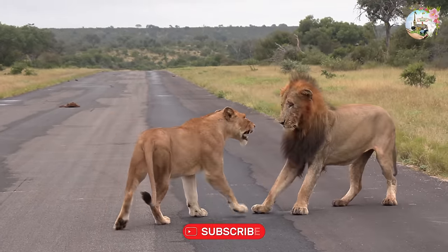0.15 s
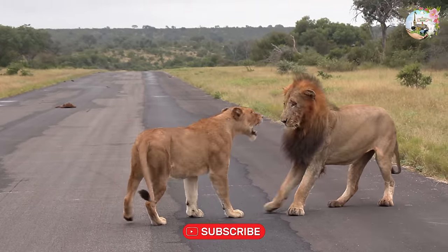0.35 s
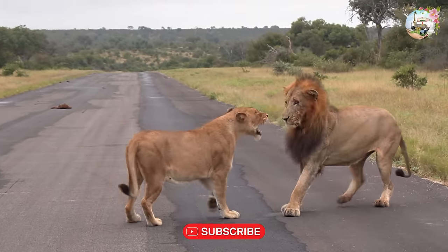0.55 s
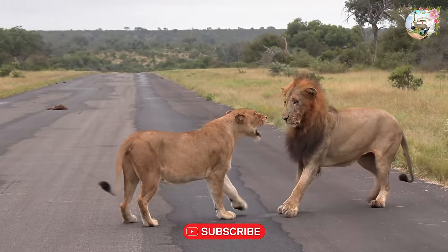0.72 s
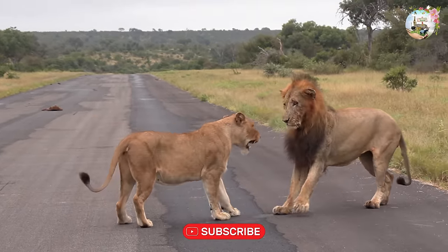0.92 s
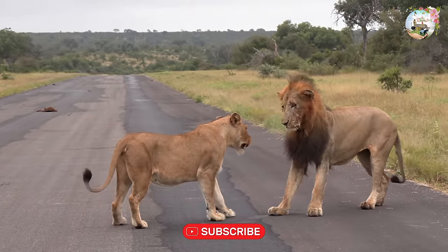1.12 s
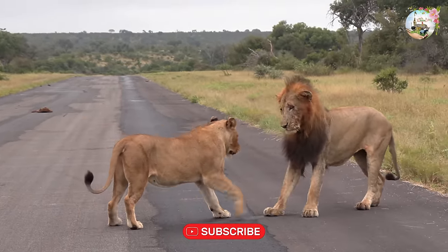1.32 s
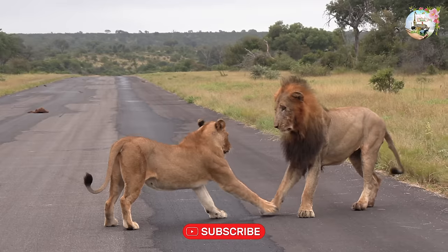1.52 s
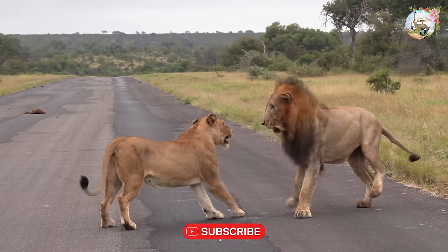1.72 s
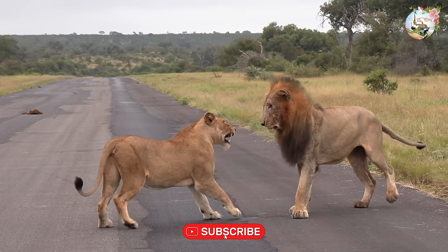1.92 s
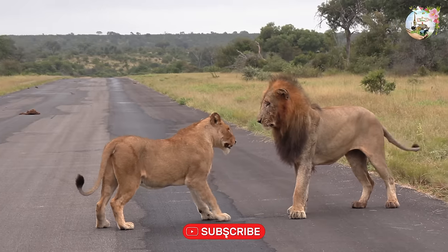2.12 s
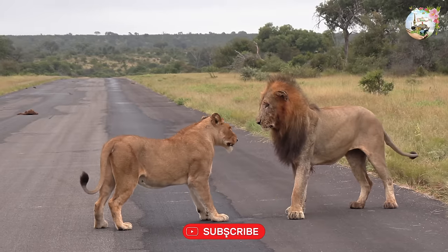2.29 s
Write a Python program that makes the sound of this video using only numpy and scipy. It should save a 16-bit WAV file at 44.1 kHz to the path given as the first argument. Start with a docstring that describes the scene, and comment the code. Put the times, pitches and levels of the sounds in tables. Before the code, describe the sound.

Raspy big-cat snarls over a wavering low chest growl, with breath hissing past teeth and hard throaty cracks; strongest around the middle and again near the end, outdoors, dry, faint low rumble, weighted right.

```python
"""Two big cats snarl at each other in short bursts on an open road, to the right of a stereo microphone. Uneven
pulses of the vocal folds ring mouth, rasp and throat; a wavering chest tone growls near 100 Hz. Filtered noise
hisses past the teeth, hard slaps of the folds are decaying pairs of sines, short clicks of tongue or teeth are
tiny noise bursts, and a faint outdoor rumble lies beneath."""
import sys
import numpy as np
from scipy import signal
from scipy.fft import rfft, irfft
from scipy.io import wavfile
from scipy.ndimage import uniform_filter1d

SR = 44100
rng = np.random.default_rng(int(sys.argv[2]) if len(sys.argv) > 2 else 0)


def generate_wav(sig):
    """Save sig (samples, or channels by samples) to the path in sys.argv[1] as 16-bit PCM at SR."""
    pcm = np.round(np.clip(np.atleast_2d(sig).T, -1, 1) * 32767).astype(np.int16)
    wavfile.write(sys.argv[1], SR, pcm)


N = 103635  # samples

# Hard slaps of the vocal folds. Each row: start in seconds, level in dB, low ring in Hz,
# upper ring's level in dB relative to the low ring, upper ring in Hz.
FOLD_SLAPS = [(0.239, -27, 487, -4, 687), (0.3904, -14.5, 332, -9, 938), (0.424, -14.5, 351, -7.5, 1197),
              (0.893, -18, 198.5, -23, 835), (0.9656, -17, 201.4, 0.5, 1100),
              (1.0419, -17, 197.5, -4.5, 928), (1.099, -10.5, 209, -7, 918), (1.158, -15, 198.4, 1, 876),
              (1.221, -18.5, 227, 0, 857), (1.382, -23.5, 163, -4, 1407), (1.4887, -17, 200, -11, 1120),
              (1.571, -17.5, 348.5, -9, 1160), (1.598, -12, 355, -15, 981.4), (1.968, -20, 364, -12, 816),
              (1.987, -14.5, 141.4, -8.5, 1112), (2.014, -15.5, 167, -10.5, 946),
              (2.044, -21.5, 439, -0.5, 833.2), (2.241, -28, 386, -10, 793)]
# Colour of breath noise and of tongue and teeth clicks. Each row: frequency in Hz, relative density in dB per
# Hz.
HISS_COLOUR = [(880, -19), (1500, -4.5), (1760, -2), (2780, -2.5), (3930, -6.5), (5940, -13.5),
               (8470, -37.5), (11000, -75)]

FOLDS_PER_S, FOLDS_SPREAD_DB = 100, 4.5  # middle pulse rate, scale of the random pulse levels
BREATH = 0.37  # share of noise between the fold pulses
VOICE_T60, HISS_T60 = 0.16, 0.27  # seconds for a burst to die by 60 dB
ATTACK_S, OPEN_S = 0.0022, 0.011  # the mouth opens slower than the chest starts
SWELL_DB, SWELL_S = -8, 0.05  # breath leaks before a burst: level at its start, seconds per 20 dB
MOUTH_WIDTH, RASP_WIDTH, TEETH_WIDTH = 68, 92, 300  # Hz, narrowest stage of each ring
MOUTH_LOWER, RASP_UPPER = 0.748, 1.247  # frequency ratios of weaker neighbour rings
TEETH_DB = -5  # whistle against the plain hiss
PUFF_DB, PUFF_S, FLUTTER_DB = 8, 0.004, 2  # puff scale, fade and smoothing time, flutter limit
CHEST_ROUGH, CHEST_WIDTH = 0.25, 30  # share of rough ring in the chest, its width in Hz
BELLY_HZ, BELLY_DB = 72, -10  # loose rumble under the chest tone
THROAT_HZ, THROAT_WIDTH = 211.2, 14.4  # Hz
SLAP_T60, UPPER_T60, SLAP_RISE_S = 0.041, 0.029, 0.00036
PUSH_DB = -5  # a pressure dip deepens the first downward swing of a slap
SHUT_DB, SHUT_S = -8, 0.006  # depth and time scale of the voice choking on a slap
AIR_DB = -47
ECHO_DB, ECHO_T60 = -17, 0.084
OUTPUT_DB = 3  # lifts both channels
EDGE_HZ, BASS_CUT_HZ = 9100, 58


def gain_of(db):
    """Amplitude factor of a level in dB."""
    return 10 ** (np.asarray(db) / 20)


def evened(x):
    """Scales a sound to an RMS of one."""
    return x / np.sqrt(np.mean(x ** 2) + 1e-20)


def steady(x):
    """Evens the slow level, keeps the fast lumps."""
    return x / np.sqrt(uniform_filter1d(x ** 2, size=3000).clip(1e-20))


def read(points, hz):
    """Reads a curve of (Hz, value) points along a logarithmic frequency axis."""
    f, value = np.transpose(points)
    return np.interp(np.log(hz + 1), np.log(f + 1), value)


def add(mix, s, sound):
    """Lays a sound into the mix at s seconds."""
    part = mix[round(s * SR):][:len(sound)]
    part += sound[:len(part)]


def slow(size):
    """A smooth random wander of RMS one; size is the smoothing length in samples."""
    return evened(uniform_filter1d(uniform_filter1d(rng.standard_normal(N), size), size))


def coloured(spectrum):
    """White noise shaped by a spectrum, at an RMS of one."""
    colour = gain_of(read(spectrum, np.fft.rfftfreq(N, 1 / SR)))
    return evened(irfft(rfft(rng.standard_normal(N)) * colour, N))


def resonate(x, hz, width):
    """One resonance along the curve hz: shifts it to zero, smooths, shifts back."""
    turn = np.exp(2j * np.pi * np.cumsum(hz * np.ones(len(x))) / SR)
    r = np.exp(-np.pi * width / SR)
    return 2 * (turn * signal.lfilter([1 - r], [1, -r], x / turn)).real


def ring(drive, hz, width):
    """A steep three-stage resonance that drifts a little as the jaw moves."""
    hz = hz * (1 + 0.031 * slow(size=1500))
    narrow = resonate(drive, hz, width)
    steeper = resonate(narrow, hz, 2 * width)
    return steady(resonate(steeper, hz, 4 * width))


def held(starts, values):
    """Each burst's value until the next burst, with a quick glide."""
    at = np.searchsorted(starts, np.arange(N) / SR).clip(1) - 1
    return uniform_filter1d(1. * values[at], size=400)


def bursts(starts, holds, dbs, t60, swell_db=-60, attack=ATTACK_S):
    """A faint swell, attack, hold, then a dying release; the loudest burst wins."""
    t = np.arange(N) / SR - starts[:, None]
    swell = gain_of(swell_db + 20 * t.clip(-1, 0) / SWELL_S)
    rise = np.maximum((t / attack).clip(0, 1), swell)
    release_db = -60 * (t - holds[:, None]).clip(0, 1) / t60
    return (rise * gain_of(dbs[:, None] + release_db)).max(axis=0)


def outdoor_air():
    """A faint low rumble of coloured noise whose level wanders slightly."""
    # Each row: frequency in Hz, relative density in dB per Hz.
    air_colour = [(12, -27.5), (20, -0.5), (130, -7), (510, -21.5), (2850, -42.5), (8470, -61.5),
                  (11000, -91.5)]
    return gain_of(AIR_DB + 0.36 * slow(size=2000)) * coloured(air_colour)


def folds():
    """Vocal folds as uneven pulses of uneven size with breath noise between."""
    size = gain_of(FOLDS_SPREAD_DB * np.minimum(rng.exponential(1, N), 3))
    turns = np.cumsum(FOLDS_PER_S * np.exp(.4 * slow(size=300))) / SR
    pulses = -size * (np.diff(np.floor(turns), prepend=0) > 0)
    return (1 - BREATH) * evened(pulses) + BREATH * rng.standard_normal(N)


def puffs(drive):
    """Gain of the hiss: it jumps at each hard slap and flutters with the folds."""
    hard = np.zeros(N)
    fade = np.exp(-np.arange(SR // 20) / SR / PUFF_S)
    for row in FOLD_SLAPS:
        add(hard, row[0], gain_of(PUFF_DB) * fade * (1 - fade ** 8))
    strength = abs(drive) - abs(drive).mean()
    flutter = evened(signal.lfilter([1], [1, -np.exp(-1 / (SR * PUFF_S))], strength))
    return gain_of(FLUTTER_DB * np.tanh(flutter / 2)) + hard


def snarl(drive):
    """Fold pulses ring the mouth and an upper rasp; fluttering noise hisses and whistles at the teeth."""
    # Each row: start in seconds, hold in seconds, mouth ring in Hz, its level in dB, rasp in Hz,
    # its level in dB, tooth whistle in Hz, hiss level in dB.
    snarl_bursts = [(0.037, 0.015, 411, -61, 980, -94, 2740, -67),
                    (0.182, 0.067, 445, -49, 1020, -68, 2640, -60.5),
                    (0.234, .09, 474, -39, 938, -54, 2440, -54.5),
                    (0.304, 0.098, 356, -35, 892, -50, 2720, -50.5),
                    (0.374, 0.064, 351.4, -29, 1090, -49, 2110, -64),
                    (0.508, 0.047, 402, -31, 992, -40, 3040, -48.5),
                    (0.616, 0.07, 413, -39, 1085, -41, 2450, -46.5),
                    (0.683, 0.043, 384, -39.5, 1014, -35.5, 2810, -45),
                    (0.734, 0.039, 358, -46, 885, -42, 2185, -50),
                    (0.843, 0.058, 438, -41, 926, -36.5, 2246, -49.5),
                    (0.967, 0.15, 401, -39, 960, -36, 2690, -45),
                    (1.015, 0.072, 341, -32, 923, -32, 2780, -47.5),
                    (1.103, 0.026, 319.4, -26.5, 937, -34, 2715, -47),
                    (1.162, 0.021, 356, -42, 1008, -34.5, 2175, -53),
                    (1.207, 0.0043, 373, -35, 932, -37, 2790, -53.5),
                    (1.368, 0.045, 392, -41.5, 1028, -43.5, 2286, -52.5),
                    (1.477, 0.043, 391, -31.5, 1107, -45, 3880, -50),
                    (1.565, 0.056, 412, -33, 1027, -44, 2230, -54),
                    (1.641, 0.07, 350, -38.5, 1033, -59.5, 2640, -61.5),
                    (1.787, 0.057, 344, -46, 891, -49, 3240, -60),
                    (1.888, 0.061, 405, -49.5, 1050, -58, 2760, -63),
                    (1.957, 0.039, 404, -27, 1024, -62, 2100, -52.5),
                    (1.987, 0.036, 386, -26, 1188, -36, 2220, -50),
                    (2.19, 0.07, 424, -59, 1166, -56, 3830, -62),
                    (2.316, .05, 362, -51, 1190, -60, 3680, -63.5)]
    s, hold, mouth_hz, mouth_db, rasp_hz, rasp_db, teeth_hz, hiss_db = np.transpose(snarl_bursts)
    mouth_hz, rasp_hz = held(s, mouth_hz), held(s, rasp_hz)

    mouth = ring(drive, mouth_hz, MOUTH_WIDTH)
    mouth = mouth + gain_of(-5) * ring(drive, MOUTH_LOWER * mouth_hz, 120)
    rasp = ring(drive, rasp_hz, RASP_WIDTH)
    rasp = rasp + gain_of(-5.5) * ring(drive, RASP_UPPER * rasp_hz, 81)
    rasp = rasp + gain_of(-7) * ring(drive, rasp_hz / RASP_UPPER, 70)

    whistle = ring(rng.standard_normal(N), held(s, teeth_hz), TEETH_WIDTH)
    hiss = evened(coloured(HISS_COLOUR) + gain_of(TEETH_DB) * whistle) * puffs(drive)

    voiced = bursts(s, hold, mouth_db, VOICE_T60, attack=OPEN_S) * mouth
    voiced = voiced + bursts(s, hold, rasp_db, VOICE_T60, SWELL_DB, OPEN_S) * rasp
    return voiced, bursts(s, hold, hiss_db, HISS_T60, SWELL_DB, OPEN_S) * hiss


def growl(drive):
    """A wavering chest tone with rough edges, and the throat's hum with a weaker rattle."""
    # Each row: start in seconds, hold in seconds, chest pitch in Hz, chest level in dB,
    # throat level in dB.
    growl_bursts = [(0.189, 0.019, 119.1, -36.5, -69), (0.236, 0.04, 85.3, -28.5, -49),
                    (0.281, 0.14, 99.14, -26.5, -67), (0.543, 0.0067, 116.9, -26, -43.5),
                    (0.604, 0.14, 108.7, -28, -44), (0.739, 0.054, 84.57, -39.5, -37.5),
                    (0.838, 0.077, 105.6, -37.5, -34), (0.959, 0.044, 85.1, -29, -24),
                    (1.023, 0.04, 89, -30.5, -20.5), (1.096, 0.017, 109.8, -27, -23),
                    (1.149, 0.058, 109.4, -31, -32), (1.376, 0.038, 124.7, -38, -39),
                    (1.476, 0.058, 113.3, -26, -38), (1.56, 0.059, 99.1, -24.5, -36),
                    (1.65, 0.06, 90.7, -34, -73), (1.799, 0.02, 83.5, -46.5, -45),
                    (1.899, 0.046, 105.2, -27.5, -44.5), (1.97, 0.046, 119.6, -20.5, -31),
                    (2.059, 0.06, 126.9, -40.5, -64), (2.229, 0.023, 142.1, -39, -60.5),
                    (2.326, .05, 134.8, -39, -45.5)]
    s, hold, hz, chest_db, throat_db = np.transpose(growl_bursts)
    hz = held(s, hz)

    tone = np.sqrt(2) * np.sin(2 * np.pi * np.cumsum(hz * (1 + .04 * slow(size=400))) / SR)
    smooth = tone * gain_of(4.1 * slow(size=300))
    rough = ring(drive, hz, CHEST_WIDTH)
    chest = steady((1 - CHEST_ROUGH) * smooth + CHEST_ROUGH * rough)
    chest = chest + gain_of(BELLY_DB) * ring(drive, BELLY_HZ, 12)

    throat_hz = THROAT_HZ * (1 + 0.0524 * slow(size=600))
    hum = np.sqrt(2) * np.sin(2 * np.pi * np.cumsum(throat_hz) / SR)
    throat = steady(hum + .5 * ring(drive, THROAT_HZ, THROAT_WIDTH))
    return bursts(s, hold, chest_db, VOICE_T60) * chest + bursts(s, hold, throat_db, VOICE_T60) * throat


def slaps():
    """Each slap starts with a downward push and rings low and high; clicks of tongue or teeth are fast-dying
    noise."""
    # Short noisy clicks of tongue or teeth. Each row: start in seconds, level in dB.
    tongue_clicks = [(0.238, -40), (0.332, -37), (0.363, -38), (0.613, -38), (1.38, -36), (2.161, -45),
                     (2.207, -49)]
    out, t = np.zeros(N), np.arange(4000) / SR
    rise = (1 - np.exp(-t / SLAP_RISE_S)) ** 2
    for s, db, hz, upper_db, upper_hz in FOLD_SLAPS:
        # the push lasts half a cycle of the low ring
        push = -gain_of(PUSH_DB) * np.sin(np.pi * (2 * hz * t).clip(0, 1)) ** 2
        low = -np.sin(2 * np.pi * hz * t) * gain_of(-60 * t / SLAP_T60)
        upper = -np.sin(2 * np.pi * upper_hz * t) * gain_of(upper_db - 60 * t / UPPER_T60)
        add(out, s, gain_of(db) * (push + rise * (low + upper)))
    for s, db in tongue_clicks:
        add(out, s, coloured(HISS_COLOUR)[:4000] * gain_of(db - 60 * t / 0.0069))
    return out


def choke():
    """Gain of the voice, which chokes for a moment just after each slap starts."""
    t = np.arange(N) / SR
    dips = sum(np.exp(-((t - row[0]) / SHUT_S - .5) ** 2) for row in FOLD_SLAPS)
    return gain_of(SHUT_DB * dips)


def voices():
    """Both cats and the outdoor air; the folds drive growl and snarl, which choke on each slap."""
    drive = folds()
    voiced, hiss = snarl(drive)
    return choke() * (growl(drive) + voiced) + hiss + outdoor_air()


def scatter(x):
    """A short smear of reflections off road and grass, as decaying noise taps."""
    t = np.arange(SR // 4) / SR
    taps = rng.standard_normal(len(t)) * gain_of(-60 * t / ECHO_T60)
    return signal.fftconvolve(x, taps / np.linalg.norm(taps))[:N]


def ports(x, other):
    """The left port hears the same sound weaker, shifted in phase and partly unrelated."""
    # Each row: frequency in Hz, left minus right level in dB.
    left_level = [(60, -4.5), (200, -7), (690, -9), (2360, -7)]
    # Each row: frequency in Hz, left-right likeness from 0 to 1.
    likeness = [(60, 1), (250, 1), (500, 0.21), (1000, 0.76), (2500, 0.47)]
    # Each row: frequency in Hz, phase in radians by which the left leads.
    left_lead = [(150, 0.76), (430, 0.75), (860, -0.54)]
    hz = np.fft.rfftfreq(N, 1 / SR)
    same = np.clip(read(likeness, hz), 0, 1)
    shared = same * np.exp(1j * read(left_lead, hz)) * rfft(x)
    unrelated = np.sqrt(1 - same ** 2) * rfft(other)
    left = irfft((shared + unrelated) * gain_of(read(left_level, hz)), N)
    return gain_of(OUTPUT_DB) * np.array([left, x])


def scene():
    """Voices, slaps and their echo; a second random rendering feeds the left port's unrelated part."""
    hard = slaps()
    near = voices() + hard
    return ports(near + gain_of(ECHO_DB) * scatter(near), voices() + scatter(hard))


def record(dry):
    """The microphone's bass cut, then the band limit."""
    cut = signal.sosfilt(signal.butter(3, BASS_CUT_HZ, "high", fs=SR, output="sos"), dry)
    return signal.oaconvolve(cut, signal.firwin(255, EDGE_HZ, window=("kaiser", 9), fs=SR)[None], "same")


dry = scene()
out = record(dry)
generate_wav(out)
```